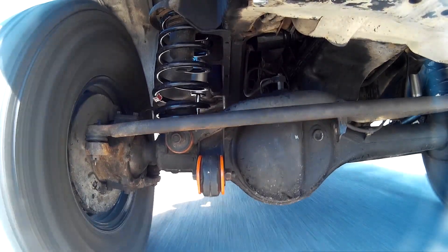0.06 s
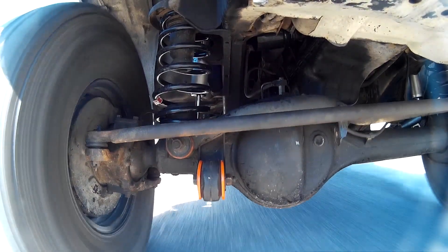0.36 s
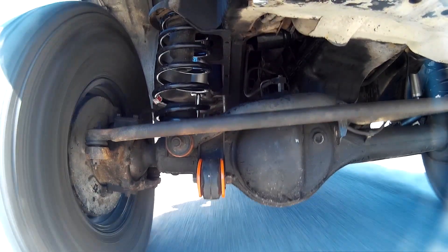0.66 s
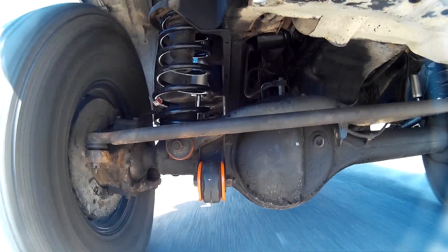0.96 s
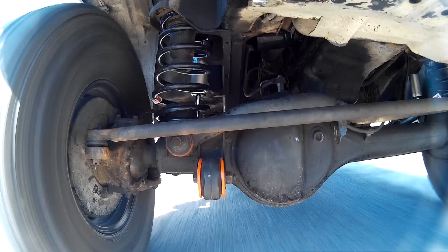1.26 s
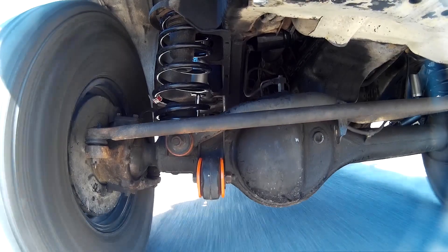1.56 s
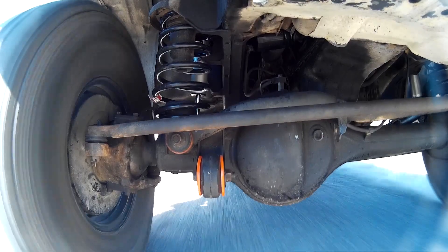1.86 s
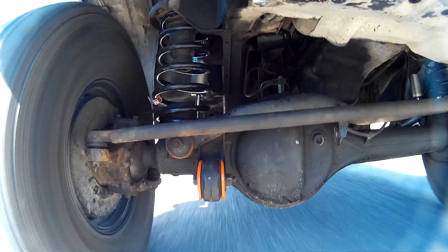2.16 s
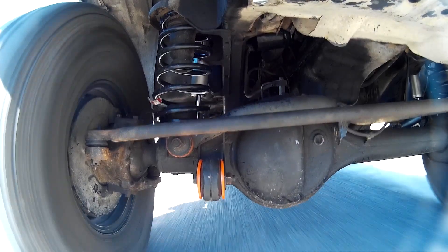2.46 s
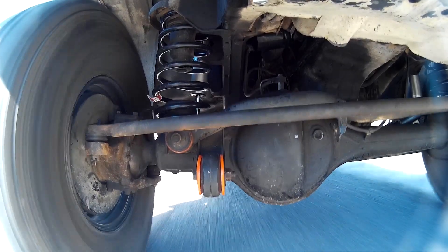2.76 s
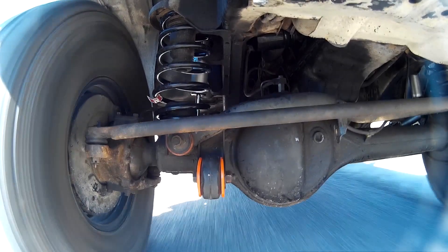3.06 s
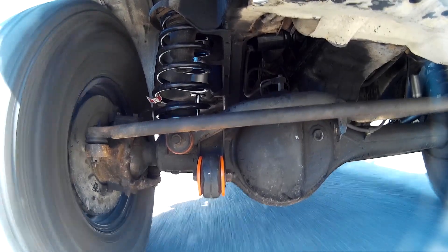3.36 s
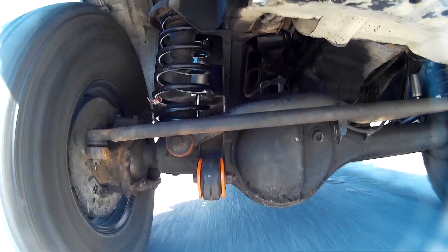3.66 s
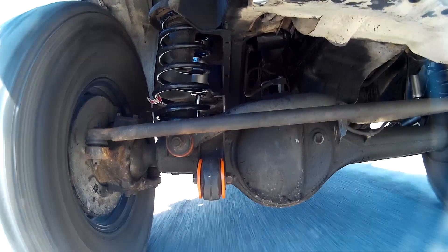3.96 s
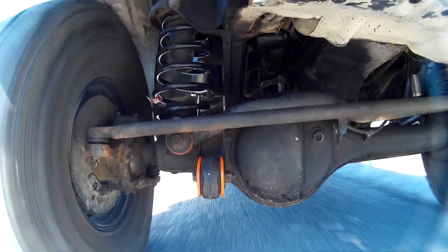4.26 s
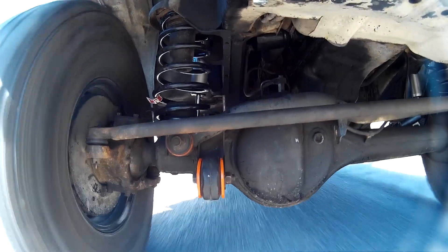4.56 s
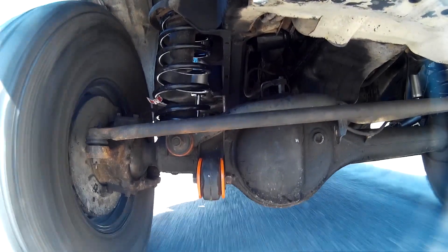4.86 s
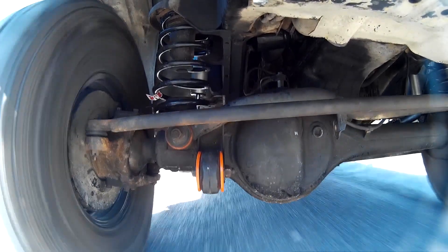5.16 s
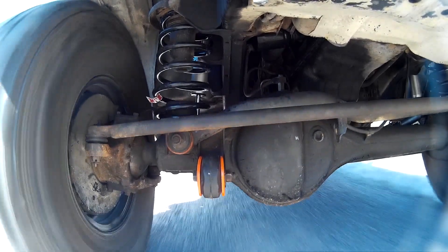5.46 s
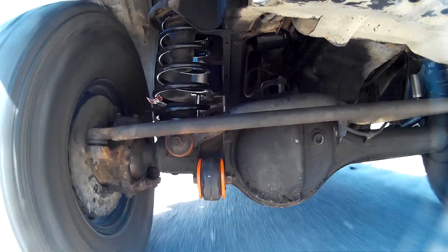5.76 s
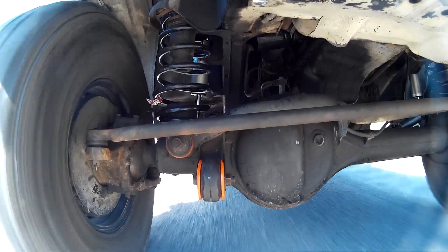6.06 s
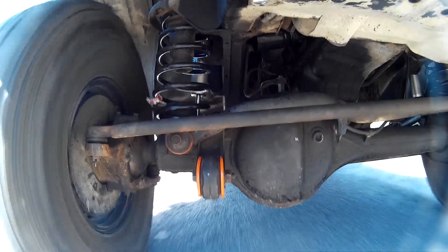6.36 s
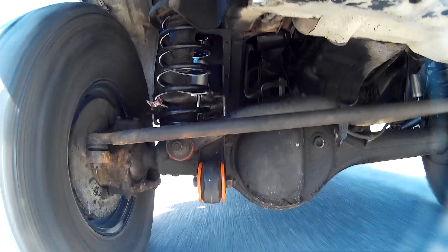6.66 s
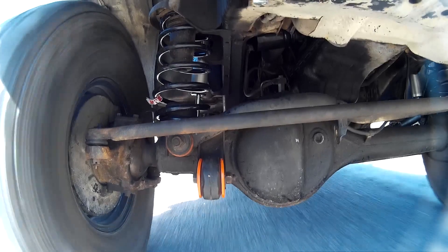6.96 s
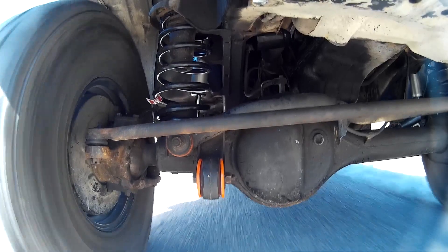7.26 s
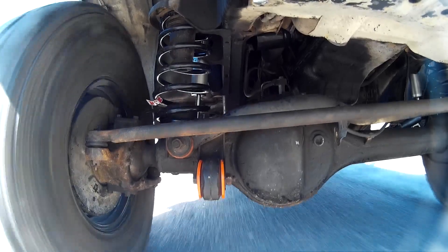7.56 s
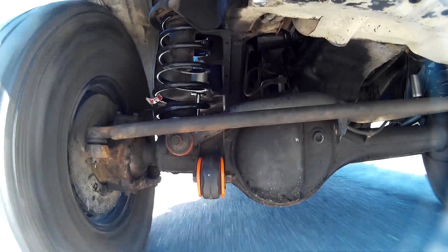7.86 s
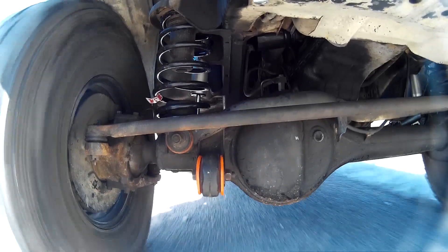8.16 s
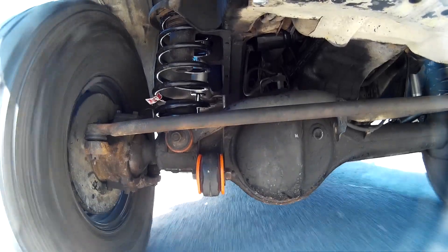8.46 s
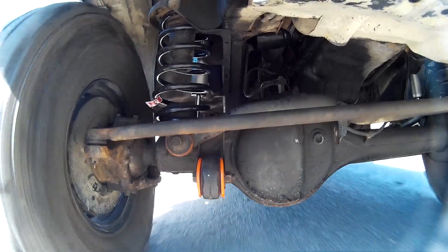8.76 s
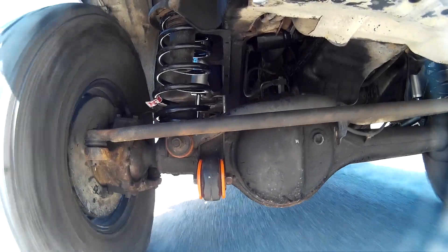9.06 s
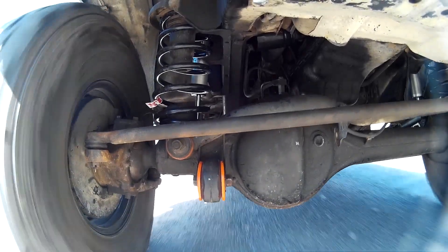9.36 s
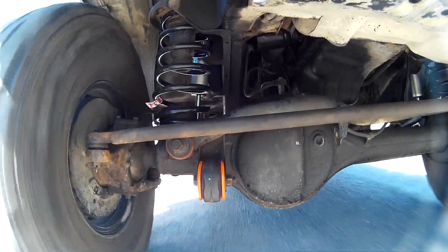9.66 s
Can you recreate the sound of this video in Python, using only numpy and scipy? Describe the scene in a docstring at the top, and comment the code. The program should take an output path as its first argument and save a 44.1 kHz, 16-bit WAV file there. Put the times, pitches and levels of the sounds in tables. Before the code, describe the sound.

Close beneath a moving off-road vehicle, the microphone's mount throbs with a heavy, low hum as tyres rumble and drum over dirt. Hollow gusts of wind with a thin hiss come and go, and soft suspension thumps punctuate the ride. The drivetrain drones more strongly for a while, then the axle takes one hard metallic knock. Later the wind builds again, carrying very faint, high whistling squeaks.

```python
"""A camera mount shudders near 46 Hz under an off-road vehicle driving a dirt road.
The camera rides in a hard case, facing the front axle. Tyres drum the chassis over a low rumble,
the drivetrain drones, gears whine, and bumps thump and knock the suspension.
Gusts and grit ring the case, air whistles and squeaks over a gap, and a faint sizzle sits behind."""
import sys
import numpy as np
from scipy import signal
from scipy.fft import rfft, irfft
from scipy.io import wavfile
from scipy.ndimage import uniform_filter1d

SR = 44100
rng = np.random.default_rng(int(sys.argv[2]) if len(sys.argv) > 2 else 0)


def output_pcm(signal):
    """Save a mono or channel-first signal as 16-bit PCM at the path in sys.argv[1].

    Samples are clipped to [-1, 1] before scaling.
    """
    pcm = np.clip(np.atleast_2d(signal).T, -1, 1) * 32767
    wavfile.write(sys.argv[1], SR, np.round(pcm).astype(np.int16))


N = 428652
T = np.arange(N) / SR

# jolts that feed (+) or check (-) the mount's swing: (time [s], level change [dB], half length [s])
MOUNT_JOLTS = [(.83, -13, 0.026), (.925, 6, 0.017), (1.022, -9, 0.013), (1.52, -5.5, 0.12), (1.78, -8, .04),
               (1.937, 5, 0.06), (2.288, -13, 0.017), (2.55, -9, 0.027), (2.69, -12, .02),
               (2.874, -11, 0.039), (3.17, 6.5, 0.023), (3.3, -14, 0.021), (4.28, 3, .06),
               (4.41, -15, .025), (5.491, -13, 0.037), (5.769, -9.5, .07), (6.02, -10, .02),
               (6.12, 5.5, 0.031), (6.417, 4, .05), (6.597, 9, 0.051), (6.792, -5.5, .05),
               (6.95, 4.5, .025), (7.056, -20, 0.028), (7.195, 4, 0.035), (7.64, 6, 0.026),
               (8.108, -16.5, 0.08), (8.312, -28, .02), (8.52, 3.5, 0.039), (8.726, -18, 0.033),
               (9.23, 7, 0.029), (9.305, -13, 0.016)]
# road roughness, heard as tyre drumming: (time [s], relative level [dB])
ROAD_ROUGHNESS = [(0, -23.5), (.4, -25), (.68, -31.5), (.9, -27), (1.85, -25), (2.02, -34.5), (2.55, -34.5),
                  (2.75, -26), (3.05, -27.5), (3.8, -31), (4.25, -28.5), (5.2, -33.5), (5.7, -24.5),
                  (6.5, -32), (6.9, -30), (7.85, -37), (8.3, -30.5), (8.7, -37.5), (8.85, -32),
                  (9.72, -30.5)]
# broad tone colour of the drumming: (frequency [Hz], relative level [dB])
DRUM_SPECTRUM = [(135, -23), (175, -15), (250, -22.5), (300, -29), (420, -29.5), (700, -36), (1100, -42)]
# chassis resonances: (frequency [Hz], width [Hz], relative level [dB])
CHASSIS_MODES = [(199.6, 29, -4.5), (238.6, 21, -1), (366, 31.8, -14)]
# tone colour of the low rumble: (frequency [Hz], relative level [dB])
RUMBLE_SPECTRUM = [(24, 0), (33, 8.5), (45, 4), (60, 13.5), (78, 2.5), (115, -4), (150, -1.5), (180, -2),
                   (230, -24)]
# drivetrain speed and mix: (time [s], shaft rate [Hz], relative drone [dB], relative upper hum [dB])
DRIVE_CURVES = [(0, 46.96, -48, -56), (.9, 47.9, -51, -54), (1.7, 44.8, -41, -49), (2.2, 44.92, -49, -51.5),
                (2.7, 44.98, -54, -45), (3.45, 48.64, -28.5, -53.5), (3.8, 47.42, -38, -62),
                (4.0, 46.8, -31, -41.5), (4.5, 46.1, -27, -39), (5.1, 44.83, -40.5, -42.5),
                (6.0, 44.53, -39, -37), (6.5, 44.96, -36.5, -45), (7.0, 45.2, -42, -48),
                (8.6, 45.32, -49, -67), (8.85, 45.06, -46, -41), (9.1, 46.42, -47, -50),
                (9.72, 46.1, -55, -40)]
# shaft orders in the upper hum: (multiple of the shaft rate, relative level [dB])
HUM_ORDERS = [(2, -2.5), (8, 0.5), (11, -11.5), (13, -17)]
# suspension thumps: (time [s], pitch [Hz], peak level [dB], half length [s])
BUMPS = [(0.115, 237, -14.5, .025), (0.369, 240, -24, 0.034), (0.906, 115, -28, .012),
         (1.62, 226, -13, 0.012), (1.798, 119, -29, .025), (1.853, 215, -22, 0.005),
         (3.054, 236, -21, 0.013), (3.485, 215, -24, 0.011), (5.505, 130, -22, 0.0066),
         (5.720, 205, -7.5, 0.0032), (5.801, 215, -24, 0.0028), (5.926, 138, -24, 0.016),
         (6.24, 225, -19, 0.013), (6.877, 238.7, -21, 0.027), (8.102, 244, -24.5, 0.024),
         (8.329, 224.8, -26, 0.023), (9.6, 133.8, -26, .016)]
# metal knocks: (time [s], peak level [dB])
KNOCKS = [(5.7288, -16), (5.737, -25), (5.785, -33)]
# ring of the axle: (frequency [Hz], relative level [dB], time to fall 60 dB [s])
AXLE_MODES = [(504, 8, 0.038), (748, -3, 0.057), (954, -8, 0.082), (1182, -7, 0.15), (1850, 4, 0.029),
              (2210, -0.5, 0.023), (3590, -9, 0.022), (5700, -16, 0.028)]
# gusts on the case: (peak start [s], hold [s], rise [s], relative rush [dB], relative hiss [dB])
GUSTS = [(-0.004, .07, 0.07, -32.5, -60), (0.227, 0.25, 0.081, -38, -65.5),
         (0.887, 0.39, 0.068, -39.5, -68.5), (1.43, 0.45, .1, -35, -62), (2.275, 0.099, 0.1, -45, -72),
         (2.615, .19, 0.055, -39.5, -69), (2.931, 0.17, .04, -36, -63.5), (3.35, 0.15, .04, -47.5, -70.5),
         (3.986, 0.21, 0.099, -44.5, -66), (4.493, 0.15, 0.054, -44, -71), (4.996, 0.061, .04, -51, -69.5),
         (5.544, 0.11, 0.082, -40.5, -66), (5.854, .1, 0.059, -38.5, -64), (6.032, .06, 0.021, -37.5, -62),
         (6.22, 0.087, 0.032, -46.5, -73), (6.86, .07, 0.051, -43.5, -73), (7.107, 0.025, 0.042, -38, -67),
         (7.55, 0.077, 0.069, -40.5, -70), (8.203, 0.28, 0.058, -33, -61), (8.77, 0.22, 0.038, -35.5, -65),
         (9.104, 0.087, 0.058, -33, -62), (9.325, 0.73, 0.044, -38.5, -67.5)]
# tone colour of the rushing air: (frequency [Hz], relative level [dB])
RUSH_SPECTRUM = [(250, -14.5), (400, -9.5), (580, -6), (800, -8), (1100, -19.5), (1900, -13), (2500, -20.5),
                 (2800, -23), (4000, -33.5), (5300, -40.5), (6500, -50.5), (9000, -54)]
# case resonances under the rush: (frequency [Hz], width [Hz], relative level [dB])
CASE_MODES = [(360, 48, 5.5), (514, 16, 3.5), (937, 15, -6), (1447, 70, 2), (1484, 343, -3),
              (1707, 130, -6), (2120, 150, -10.5), (3023, 200, -18), (3314, 153, -16.5), (3750, 390, -21),
              (4195, 120, -26), (4540, 100, -26.5), (4900, 250, -29.5), (5685, 360, -30.5)]
# tone colour of the thin hiss: (frequency [Hz], relative level [dB])
HISS_SPECTRUM = [(4500, -23.5), (6300, -13), (8400, -13), (9700, -17), (11700, -17.5), (13000, -26),
                 (16000, -33.5)]
# high case resonances under the hiss: (frequency [Hz], width [Hz], relative level [dB])
CASE_HIGH_MODES = [(6850, 320, -6), (7650, 750, -5), (9050, 500, -15.5), (10280, 410, -9),
                   (11000, 470, -0.5)]
# gear whines: (start [s], length [s], starting pitch [Hz], level [dB])
GEAR_WHINES = [(3.9, 0.501, 736, -51), (5.852, 0.93, 702, -56.5), (7.749, .35, 963, -61.5),
               (9.3, 0.389, 949.5, -55)]
# swells of the narrow sizzle: (time [s], level [dB])
SIZZLE_LEVELS = [(0, -82), (3.0, -76), (3.4, -59), (3.9, -68), (4.7, -63), (5.3, -63.5), (6.0, -56),
                 (6.7, -65.5), (7.3, -71), (9.7, -77)]
# squeaks of the whistle: (start [s], length [s], top pitch [Hz], level [dB])
SQUEAKS = [(7.2, .42, 11080, -75), (8.27, .16, 10400, -67), (8.42, .4, 11100, -67.5),
           (8.83, .3, 11100, -63.5), (9.13, .34, 11080, -68), (9.48, .4, 11120, -67)]
# thin steady tones that swell with the hiss: (pitch [Hz], relative level [dB])
THIN_TONES = [(9489, -22.5), (9562, -22.5), (9635, -28)]


def mount_shake(swing_hz=45.74, wander_hz=1.14, level_db=-17.5, wander_db=1.4, shudder_db=1.5):
    """The camera swings near its mount's natural rate, shuddering; jolts feed the swing or check it."""
    jolts = [1 + (undb(db) - 1) * swell(time, half_s) for time, db, half_s in MOUNT_JOLTS]
    swing_db = level_db + wander_db * wander(14) + shudder_db * wander(45)
    swing = tone(swing_hz + wander_hz * wander(7.9))
    return np.prod(jolts, axis=0) * undb(swing_db) * swing


def tyres(road_db, rumble_db=-29.5, rumble_follow=0.23):
    """Tread drums over patchy dirt and booms in the chassis; a low rumble loosely follows the road."""
    drum = resonate(eddies(flutter_db=2.5, rate=17), DRUM_SPECTRUM, CHASSIS_MODES)
    rumble = resonate(rng.standard_normal(N), RUMBLE_SPECTRUM, [])
    lift_db = rumble_follow * (road_db - road_db.mean())
    return undb(road_db - 0.5) * drum + undb(rumble_db + lift_db) * rumble


def drivetrain(road_db, boom_db=-5.5):
    """Engine orders sag and recover with speed: the fourth drones, the fifth booms on rough ground."""
    shaft_hz, drone_db, hum_db = curves(DRIVE_CURVES)
    shaft_hz = shaft_hz * (1 + 0.00598 * wander(25))
    orders = [(4, drone_db), (5, road_db + boom_db)]
    orders += [(order, hum_db + db) for order, db in HUM_ORDERS]
    return sum(undb(db - 0.5 + 1.17 * wander(12)) * tone(order * shaft_hz) for order, db in orders)


def suspension_bumps():
    """Rubber bushes cushion each bump into a few swelling and fading cycles."""
    return sum(undb(db) * swell(time, half_s) * np.sin(2 * np.pi * hz * (T - time))
               for time, hz, db, half_s in BUMPS)


def axle_knocks(attack_s=0.0007, crack_s=0.0045, crack_db=-11):
    """Metal meets metal: a short dull crack and the damped ring of the axle."""
    out, t = np.zeros(N), T[:SR // 4]
    soften = signal.butter(6, 6000, fs=SR, output="sos")
    attack = np.minimum(t / attack_s, 1)
    for time, peak_db in KNOCKS:
        ring = sum(undb(db - 60 * t / t60) * np.sin(2 * np.pi * hz * t + rng.uniform(0, 2 * np.pi))
                   for hz, db, t60 in AXLE_MODES)
        crack = undb(crack_db) * np.exp(-t / crack_s) * rng.standard_normal(len(t))
        knock = signal.sosfilt(soften, attack * (ring + crack))
        start = int(time * SR)
        out[start:start + len(t)] += undb(peak_db) * knock / np.abs(knock).max()
    return out


def airflow(breeze_rush_db=-47.5, breeze_hiss_db=-74, release_s=0.052):
    """Gusts rise, hold and die away over a steady breeze: the gains of the rush and of the hiss."""
    rush_power, hiss_power = undb(breeze_rush_db) ** 2, undb(breeze_hiss_db) ** 2
    for start, hold, rise, rush_db, hiss_db in GUSTS:
        before, after = np.maximum(start - T, 0), np.maximum(T - start - hold, 0)
        gust = np.exp(-before / rise - (after / release_s) ** 1.05)
        rush_power += gust * undb(rush_db) ** 2
        hiss_power += gust * undb(hiss_db) ** 2
    return np.sqrt(rush_power), np.sqrt(hiss_power)


def wind(rush_gain, hiss_gain):
    """Gusts and blown sand ring the case; the high hiss flutters with the same eddies."""
    force = unit_rms(eddies(flutter_db=0.85, rate=110)) + undb(-16) * grit(rate=1900, spread_db=5)
    force *= undb(0.75 * wander(25))
    rush = undb(2.04) * resonate(force, RUSH_SPECTRUM, CASE_MODES)
    hiss = undb(1.05) * resonate(force, HISS_SPECTRUM, CASE_HIGH_MODES)
    return rush_gain * rush + hiss_gain * hiss


def eddies(flutter_db, rate):
    """Turbulent pressure: noise that comes in quick puffs."""
    return rng.standard_normal(N) * undb(flutter_db * wander(rate))


def grit(rate, spread_db):
    """Sand grains strike about rate times a second, some harder than the rest."""
    hits = rng.random(N) < rate / SR
    polarity = rng.choice([-1, 1], N)
    strength = undb(spread_db * np.minimum(rng.exponential(size=N), 2))
    return unit_rms(hits * polarity * strength)


def gear_whine(sag=0.035):
    """A thin gear whine comes and goes, drooping in pitch."""
    out = np.zeros(N)
    for start, length, hz, db in GEAR_WHINES:
        progress, envelope = note(start, length)
        gain = envelope * undb(db + 3.7 * wander(25))
        out += gain * tone(hz * (1 - sag * progress) + 6 * wander(50))
    return out


def sizzle(centre_hz=3090, width_hz=260):
    """A narrow, flickering sizzle carries on between the gusts."""
    (level_db,) = curves(SIZZLE_LEVELS)
    flicker = eddies(flutter_db=3.5, rate=110)
    skirt = [(2000, -30.5), (4000, -28.5)]
    return undb(level_db) * resonate(flicker, skirt, [(centre_hz, width_hz, 0)])


def gap_whistle(hiss_gain, pitch_hz=10930, waver_hz=35, rough_hz=20, arch_hz=430):
    """Air over a narrow gap sings a high, unsteady note that grows with gusts, plus arching squeaks."""
    waver = waver_hz * wander(70) + rough_hz * wander(500)
    whistle = undb(-14) * hiss_gain * tone(pitch_hz + 100 * wander(8) + waver)
    for start, length, top_hz, db in SQUEAKS:
        progress, envelope = note(start, length)
        squeak_hz = top_hz - arch_hz * (2 * progress - 1) ** 2
        whistle += undb(db) * envelope * tone(squeak_hz + waver)
    thin_tones = sum(undb(db) * tone(np.full(N, float(hz))) for hz, db in THIN_TONES)
    return whistle * undb(2.5 * wander(45)) + hiss_gain * thin_tones


def resonate(force, spectrum, modes):
    """Colour a force with a broad spectrum and steep-sided resonances on top; comes out at rms 1."""
    freqs = np.fft.rfftfreq(N, 1 / SR) + 1e-3
    hz, db = np.transpose(spectrum)
    power = undb(np.interp(np.log(freqs), np.log(hz), db)) ** 2
    power /= 1 + (freqs / hz[-1] / 2) ** 10 + (hz[0] / freqs / 2) ** 10  # cut an octave past each end
    for centre, width, mode_db in modes:
        power += undb(mode_db) ** 2 / (1 + 2 * ((freqs - centre) / width) ** 2) ** 2
    return unit_rms(irfft(rfft(force) * np.sqrt(power), N))


def tone(hz):
    """A sine of rms 1 on a moving pitch."""
    return np.sqrt(2) * np.sin(2 * np.pi * np.cumsum(hz) / SR)


def wander(rate):
    """Smooth random drift of rms 1 that changes about rate times a second."""
    hold = max(int(SR / rate), 2)
    steps = np.repeat(rng.standard_normal(N)[:N // hold + 1], hold)
    return unit_rms(uniform_filter1d(uniform_filter1d(steps, hold), hold)[:N])


def swell(time, half_s):
    """A bell-shaped envelope of height 1 around a moment."""
    return np.exp(-0.5 * ((T - time) / half_s) ** 2)


def note(start, length):
    """Progress 0-1 through a note, and its rounded envelope."""
    progress = np.clip((T - start) / length, 0, 1)
    return progress, np.sqrt(4 * progress * (1 - progress))


def curves(table):
    """The columns of a timed table as control curves, one value a sample."""
    times, *columns = np.transpose(table)
    return [np.interp(T, times, column) for column in columns]


def undb(db):
    """Decibels to gain."""
    return 10 ** (np.asarray(db) / 20)


def unit_rms(x):
    """Scale to rms 1."""
    return x / np.sqrt(np.mean(x ** 2))


def scene():
    """Vehicle and air meet at the one microphone in the case."""
    (road_db,) = curves(ROAD_ROUGHNESS)
    rush_gain, hiss_gain = airflow()
    running = mount_shake() + tyres(road_db) + drivetrain(road_db) + gear_whine()
    impacts = suspension_bumps() + axle_knocks()
    air = wind(rush_gain, hiss_gain) + sizzle() + gap_whistle(hiss_gain)
    return (running + impacts + air)[None]


def record(dry):
    """A faint hiss is added, the top is cut, and both ends are faded briefly."""
    top_hz, fade_s = 15600, 0.004
    hiss = undb(-72) * rng.standard_normal(dry.shape)
    high_cut = signal.ellip(10, 0.2, 80, top_hz, fs=SR, output="sos")
    fades = np.minimum(np.minimum(T, T[-1] - T) / fade_s, 1)
    return fades * signal.sosfilt(high_cut, dry + hiss)


dry = scene()
out = record(dry)
output_pcm(out)
```